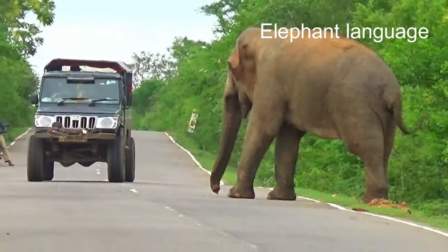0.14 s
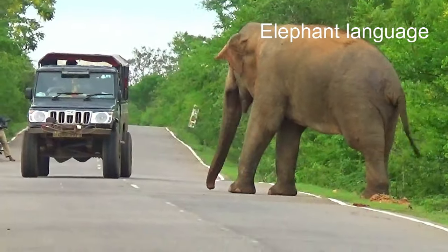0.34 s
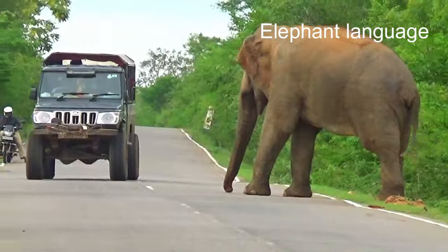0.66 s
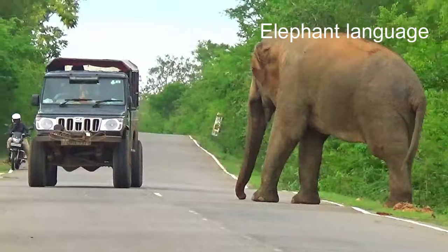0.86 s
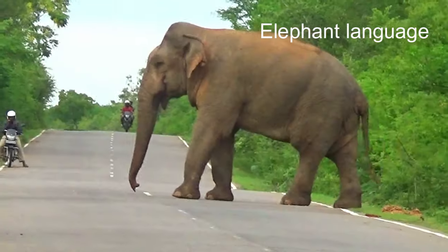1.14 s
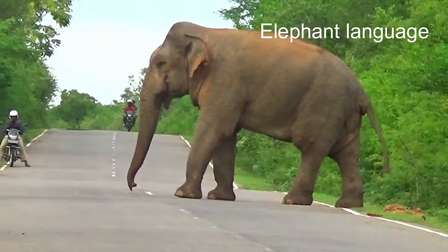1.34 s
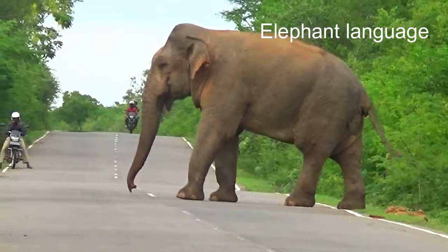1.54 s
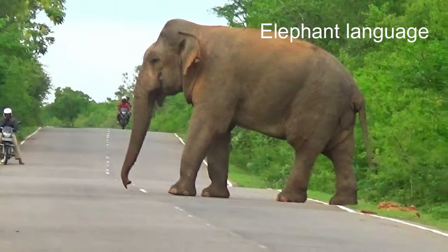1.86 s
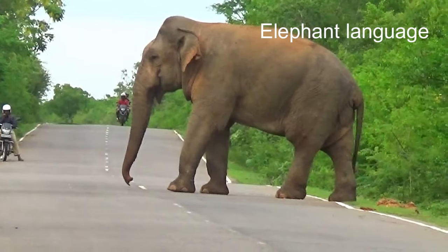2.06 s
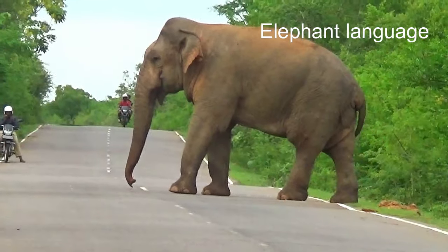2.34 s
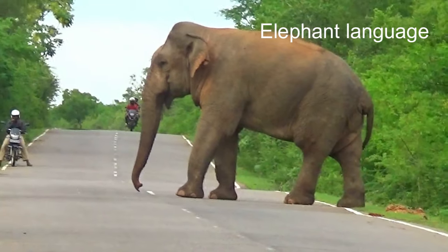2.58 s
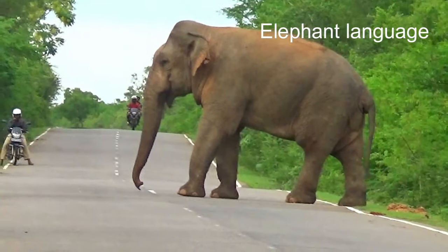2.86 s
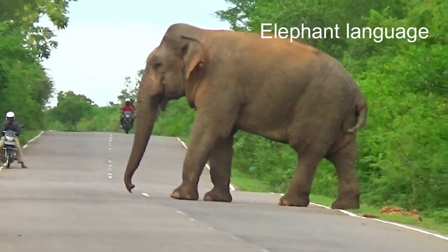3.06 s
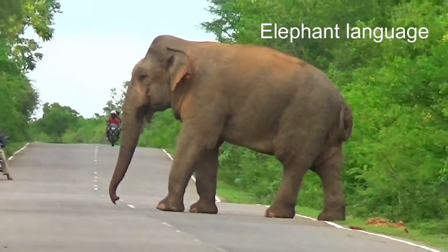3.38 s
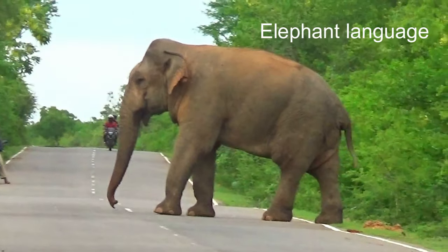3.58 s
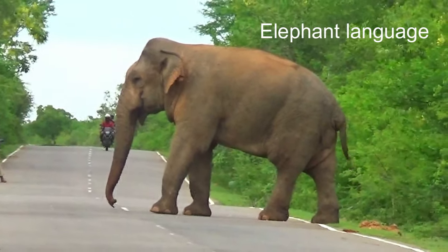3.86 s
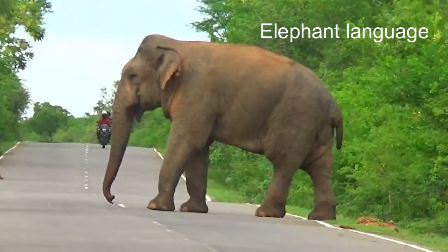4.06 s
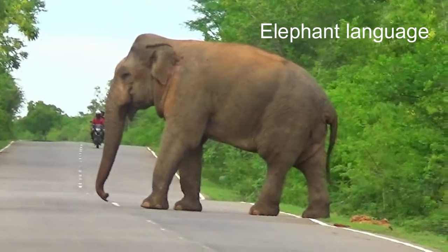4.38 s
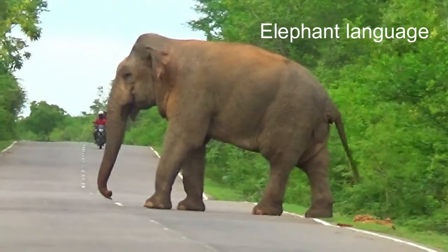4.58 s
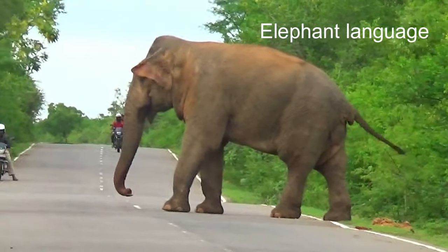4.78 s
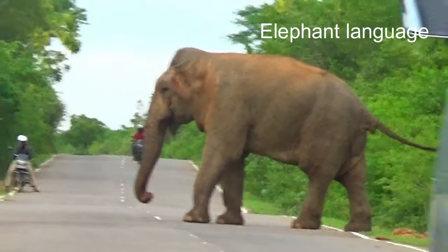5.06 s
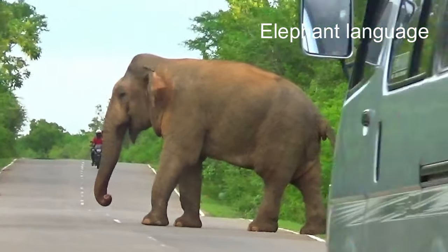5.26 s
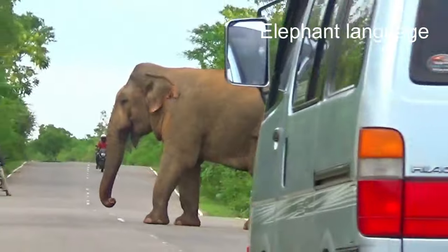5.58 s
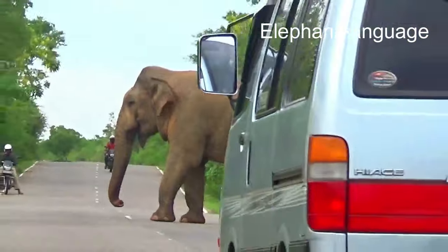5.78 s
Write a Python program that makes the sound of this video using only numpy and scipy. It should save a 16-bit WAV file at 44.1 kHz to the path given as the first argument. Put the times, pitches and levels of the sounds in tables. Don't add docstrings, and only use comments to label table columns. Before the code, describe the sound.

A bird whistles over a breezy rural road, then a clattering diesel van roars by, tyres humming, and fades with a squeaking panel.

```python
import sys
import numpy as np
from scipy import signal
from scipy.io import wavfile
from scipy.ndimage import uniform_filter1d

SR = 44100
rng = np.random.default_rng(int(sys.argv[2]) if len(sys.argv) > 2 else 0)


def log_audio(samples):
    frames = np.atleast_2d(samples).T
    limited = np.clip(frames, -1, 1)
    pcm = np.round(limited * 32767).astype(np.int16)
    wavfile.write(sys.argv[1], SR, pcm)


def gain_from_decibels(decibels):
    exponent = np.asarray(decibels, float) / 20
    return 10 ** exponent


N = 261513
HOP = 256
HZ = np.fft.rfftfreq(1024, 1 / SR)

# [side, bass L-R/dB, roar L-R/dB, clatter L-R/dB, fizz L-R/dB]
PAN_BY_SIDE = [(0, -1, -2.3, -1.6, 0), (1, -2.3, -2.7, -1.5, 2), (1.6, -4.5, -2.5, -3.5, 1.5),
               (2.2, -6, -1, -3, 0), (3, -6, .7, -1.3, -2), (3.3, -3.5, 2.8, -.3, -2), (4, -1, 2, 0, -1),
               (5, -.4, 2, 1, -.6)]


def evened(x):
    return x / np.sqrt(np.mean(x ** 2) + 1e-20)


def read(points, hz):
    f, value = np.transpose(points)
    return np.interp(np.log(hz + 1), np.log(f + 1), value)


def columns(rows, t):
    s, *cols = np.transpose(rows)
    return [np.interp(t, s, c) for c in cols]


def add(mix, s, sound):
    part = mix[round(s * SR):][:len(sound)]
    part += sound[:len(part)]


def resonate(x, hz, width_hz):
    r = np.exp(-np.pi * width_hz / SR)
    gain = (1 - r * r) / 2
    return signal.lfilter([gain, 0, -gain], [1, -2 * r * np.cos(2 * np.pi * hz / SR), r * r], x)


def ring(drive, modes):
    out = 0
    for hz, width_hz, db in modes:
        once = resonate(drive, hz, 1.4 * width_hz)
        out = out + gain_from_decibels(db) * np.sqrt(100 / width_hz) * resonate(once, hz, 1.4 * width_hz)
    return evened(out)


def bells(modes):
    return sum(db * np.exp(-((HZ - hz) / width_hz) ** 2 * 2) for hz, width_hz, db in modes)


def drift(seconds):
    steps = rng.standard_normal(N // 64 + 2)
    size = max(int(seconds * SR / 64), 1)
    smooth = evened(uniform_filter1d(uniform_filter1d(steps, size), size))
    return np.interp(np.arange(N) / 64, np.arange(len(steps)), smooth)


def noise(level_db, modes_db, same, pan_db, patchy_db):
    a, b, c, d, patches = rng.standard_normal(level_db.shape + (5,)).transpose(2, 0, 1)
    patches = evened(uniform_filter1d(uniform_filter1d(patches, size=12, axis=0), size=8, axis=1))
    same = np.clip(same, 0, 1)
    direct = (a + 1j * b) * gain_from_decibels(modes_db)
    scattered = (c + 1j * d) * np.sqrt((1 - same) / (1 + same))
    z = np.array([(direct + scattered) * gain_from_decibels(pan_db / 2), (direct - scattered) * gain_from_decibels(-pan_db / 2)])
    z *= gain_from_decibels(level_db + patchy_db * patches)
    return 0.7 * signal.istft(z.transpose(0, 2, 1), nperseg=1024, noverlap=1024 - HOP)[1][:, :N]


def air():
    # [f/Hz, density/(dB per Hz)]
    colour = [(18, -59), (30, -18), (81, -18), (103, -8.5), (187, -5.5), (284, -8), (322, -4), (433, -13.5),
              (659, -7), (844, -23), (955, -18.5), (1820, -21.5), (5810, -32), (7620, -18.5),
              (11000, -40.5), (14400, -74), (22000, -120)]
    # [f/Hz, likeness 0-1]
    likeness = [(60, 1), (220, 0.47), (800, 0.8), (2910, 0.43), (10600, 0.66)]
    field = np.tile(read(colour, HZ), (N // HOP + 5, 1))
    wash = evened(noise(field, 0, read(likeness, HZ), -0.14, patchy_db=1.5))
    low = signal.sosfiltfilt(signal.butter(2, 500, fs=SR, output="sos"), wash)
    return gain_from_decibels(-51.5) * (wash - low + low * gain_from_decibels(3.8 * drift(0.029)))


def ground():
    low = signal.sosfilt(signal.butter(4, 70, fs=SR, output="sos"), rng.standard_normal((2, N)))
    return gain_from_decibels(-82) * evened(low + 0.6 * low[::-1])


def insects():
    # [f/Hz, width/Hz, level/dB]
    band = (7300, 920, -58)
    return gain_from_decibels(band[2]) * ring(rng.standard_normal((2, N)), [band])


def idler():
    # [f/Hz, width/Hz, level/dB]
    modes = [(2500, 200, 5), (3060, 160, 4), (3900, 500, -23)]
    start_s, firings_per_s, decay_s = .089, 25.03, 0.0046
    turns = (np.arange(N) / SR - start_s) * firings_per_s
    ticks = signal.oaconvolve(knocks(turns, spread_db=0.5), np.exp(-np.arange(600) / SR / decay_s))[:N]
    return gain_from_decibels(-69) * ring(ticks * rng.standard_normal(N), modes)


def puffs():
    # [t/s, peak/dB, f/Hz]
    pushes = [(0.091, -59, 223), (0.123, -48, 180), (0.196, -40, 207), (0.258, -33.5, 150),
              (0.397, -37, 237), (0.483, -53, 177), (0.564, -54, 91.5), (0.565, -44, 148), (0.62, -51, 202),
              (0.676, -33, 240), (0.734, -39, 180), (0.829, -29.5, 200), (0.879, -43, 231),
              (1.003, -40, 175)]
    out, cycles = np.zeros(N), 3.5
    for s, db, hz in pushes:
        u = np.arange(int(cycles * SR / hz)) * hz / SR
        add(out, s, gain_from_decibels(db - 8.5) * np.sin(2 * np.pi * u) * np.sin(np.pi * u / cycles) ** 2)
    return out


def bird():
    # [t/s, length/s, first f/Hz, last f/Hz, level/dB]
    notes = [
        (-.02, 0.092, 2860, 2950, -62),
        (0.06, 0.051, 2940, 2910, -64),
        (.11, .095, 2900, 2925, -73),
        (.205, 0.032, 2640, 2590, -70),
        (0.229, 0.062, 2590, 2480, -68),
        (0.276, 0.055, 2480, 2425, -58.5),
        (0.318, 0.1, 2430, 2420, -56.5),
        (0.411, 0.052, 2390, 2140, -62),
        (1.134, .126, 3900, 3780, -67),
    ]
    t, level = np.arange(N) / SR, np.zeros(N)
    edge_share = 0.3
    s, length, first_hz, last_hz, _ = np.transpose(notes)
    inner = length * edge_share / 4
    knots_s = np.ravel([s + inner, s + length - inner], "F")
    hz = np.interp(t, knots_s, np.ravel([first_hz, last_hz], "F"))
    for start, span, _, _, db in notes:
        u = (t - start) / span
        level += gain_from_decibels(db + 4.5) * np.clip(np.minimum(u, 1 - u) * 2 / edge_share, 0, 1)
    hz = uniform_filter1d(hz, size=500) + 9 * drift(.01)
    out = level * np.sin(2 * np.pi * np.cumsum(hz) / SR) * gain_from_decibels(0.9 * drift(.008))
    return out + gain_from_decibels(-18) * np.roll(out, int(0.042 * SR)) + gain_from_decibels(-17) * np.roll(out, int(.075 * SR))


def passing(t):
    # [t/s, roar/dB, side]
    track = [(1.14, -36, 0.2), (1.75, -31, 0.12), (2.22, -26.5, 0.54), (2.54, -22, 1.08),
             (2.78, -19.5, 1.43), (3.0, -17, 1.73), (3.12, -15.5, 1.75), (3.24, -16, 2.25),
             (3.36, -16.5, 2.5), (3.48, -18, 2.95), (3.8, -21, 2.99), (4.2, -23.5, 3.51), (4.55, -25, 4.3),
             (5.13, -29.5, 4.98), (5.4, -30.5, 4.94), (5.6, -31, 5.36), (5.93, -32.5, 5.2)]
    # [side, rumble/dB, hiss/dB, fizz/dB]
    balance = [(0, -14, -9, -22), (.22, -12.5, -9.5, -21.5), (.48, -10.5, -10, -21.5),
               (.85, -11.5, -11, -21.5), (1.08, -11.5, -6, -20), (1.3, -10.5, -10, -20.5),
               (1.6, -8.5, -10, -17), (1.75, -11, -8.5, -13.5), (1.9, -14.5, -9.5, -13),
               (2.05, -11, -7, -12.5), (2.25, -13, -9, -10), (2.8, -7.5, -3.5, -10),
               (3.15, -8.5, -3.5, -10.5), (3.6, -12, -5, -13.5), (4.4, -12, -4.5, -15), (5, -10, -7, -12),
               (5.4, -10.5, -5.5, -8)]
    roar_db, facing = columns(track, t)
    rumble, hiss, fizz = columns(balance, facing)
    return facing, [roar_db + rumble, roar_db, roar_db + hiss, roar_db + fizz]


def shares(facing):
    return [np.clip(1 - abs(np.minimum(facing, 4) - k), 0, 1) for k in range(5)]


def doppler(t):
    pass_s, turn_s = 3.22, 0.25
    return 1 - np.tanh((t - pass_s) / turn_s)


def knocks(turns, spread_db):
    fired = np.diff(np.floor(turns), prepend=np.floor(turns[0]))
    return fired * gain_from_decibels(spread_db * rng.standard_normal(N))


def roar():
    # [f/Hz, density/(dB per Hz)]
    nose = [(30, -50), (80, -44), (140, -22), (250, -7), (450, -0.5), (800, 2.5), (1300, 7), (2500, -11),
            (2900, -22.5), (4200, -33), (6000, -37), (11000, -46.5)]
    wing = [(30, -46.5), (80, -40), (170, -13.5), (300, -6), (500, 2), (850, -1.5), (1300, -6.5),
            (2500, -18.5), (4000, -27.5), (6000, -31), (11000, -34)]
    flank = [(30, -45), (80, -30), (130, -20), (200, 6.5), (350, 0), (500, -12), (800, -7.5), (2000, -12.5),
             (4800, -24), (5500, -26), (11000, -26.5)]
    haunch = [(30, -47), (80, -40), (140, -28.5), (250, -15.5), (400, -14), (600, -3), (1000, -4),
              (3000, -11.5), (4800, -20.5), (5500, -25.5), (11000, -36.5)]
    tail = [(30, -29), (80, -39), (140, -13.5), (240, -10), (450, -9), (650, -1.5), (1200, -5.5),
            (2500, -12.5), (4800, -21.5), (5300, -24.5), (11000, -31.5)]
    # [f/Hz, width/Hz, level/dB]
    nose_modes = [(258, 28, 14), (352, 83, -21), (756, 160, 4), (1380, 83, -29), (1540, 130, 1),
                  (2180, 84, -15.5), (2590, 150, 7), (3210, 160, 4.5), (3780, 130, 1), (4500, 130, 6),
                  (1790, 70, -16), (2756, 157, -23), (3500, 100, -10), (4896, 240, -5), (5700, 100, -4)]
    wing_modes = [(456, 120, 2), (580, 100, -4.5), (888, 290, 5.5), (1620, 220, 7), (3830, 210, 4),
                  (1394, 130, -10.5), (2200, 510, 3.5), (4680, 100, 8)]
    flank_modes = [(653, 210, 4.5), (990, 180, 1.1), (2010, 400, 3.5), (7000, 990, 1.6), (11060, 1200, 9.3)]
    haunch_modes = [(380, 69, -3.5), (523, 74, 3.5), (600, 65, 3), (940, 36, -10), (1750, 210, 3),
                    (2350, 100, 0), (7300, 890, 2.5), (8840, 920, -5), (5270, 380, -3.5)]
    tail_modes = [(240, 27, 13.5), (401, 89, -15), (610, 170, 3), (914, 93, -16.5), (1193, 150, 4),
                  (1630, 51, 7), (2150, 147, 0), (2430, 90, 2.5), (2800, 84, -2.5), (5070, 120, -8),
                  (8960, 870, -3)]
    far_modes = [(5870, 1300, -4.5), (8300, 2500, -3), (192, 260, 5)]
    # [side, f/Hz, level/dB]
    ridge = [(.7, 800, 2.5), (1.1, 860, 0.5), (1.45, 930, 4.5), (1.75, 980, 0), (2.15, 1070, 4),
             (2.6, 1150, -1)]
    # [f/Hz, likeness 0-1]
    likeness = [
        [(60, 0.98), (140, 0.99), (340, 0.96), (800, 0.88), (1890, 1), (4470, 0.34), (10600, 0.94)],
        [(60, 0.93), (140, 1), (340, 1), (800, 0.6), (1890, 0), (4470, 0.3), (10600, 0.9)],
        [(60, 0.68), (140, 1), (340, 0.85), (800, 0), (1890, 0.66), (4470, 0.5), (10600, 0.46)],
        [(60, 0.87), (140, 0.8), (340, 0.88), (800, 0.62), (1890, 0.72), (4470, 0.79), (10600, 0.7)],
        [(60, 0.6), (140, 0.89), (340, 0.96), (800, 0.9), (1890, 0.86), (4470, 0.9), (10600, 0.89)],
    ]
    # [low f/Hz, high f/Hz]
    layers = [(60, 400), (400, 2500), (2500, 6000), (6000, 11000)]

    t = np.arange(N // HOP + 5) * HOP / SR
    facing, levels_db = passing(t)
    weights = shares(facing[:, None])
    field = sum(w * read(s, HZ) for w, s in zip(weights, [nose, wing, flank, haunch, tail]))
    side_modes = [nose_modes, wing_modes, flank_modes, haunch_modes, tail_modes]
    modes = sum(w * bells(s) for w, s in zip(weights, side_modes))
    modes = modes + np.clip(facing - 4, 0, 1)[:, None] * bells(far_modes)
    ridge_hz, ridge_db = columns(ridge, facing[:, None])
    ridge_width_hz = 140
    modes = modes + ridge_db * np.exp(-((HZ - ridge_hz) / ridge_width_hz) ** 2 * 2)
    same = sum(w * read(s, HZ) for w, s in zip(weights, likeness))

    power = gain_from_decibels(field + modes) ** 2
    centres = np.sqrt(np.prod(layers, axis=1))
    for db, (lo, hi), one in zip(levels_db, layers, np.eye(len(layers))):
        lift = db - 10 * np.log10(power[:, (HZ >= lo) & (HZ < hi)].sum(1))
        field = field + lift[:, None] * read(list(zip(centres, one)), HZ)

    bass, upper, clatter, fizz = (pan[:, None] for pan in columns(PAN_BY_SIDE, facing))
    low = read([(300, 1), (550, 0)], HZ)
    above = read([(1200, 0), (1900, 1)], HZ)
    high = read([(5500, 0), (7500, 1)], HZ)
    pan_db = bass * low + upper * (1 - low - above) + clatter * (above - high) + fizz * high
    return noise(field, modes, same, pan_db, patchy_db=1.03)


def hum():
    t = np.arange(N) / SR
    start_s, end_s, rise_db_per_s, fall_db_per_s = 3.07, 4.05, 108.5, 44
    hz = 620 + 55 * doppler(t) / 2
    db = -33.5 - rise_db_per_s * np.maximum(start_s - t, 0) - fall_db_per_s * np.maximum(t - end_s, 0)
    turn = 2 * np.pi * np.cumsum(hz) / SR
    steady = 1.74
    return gain_from_decibels(db) * ((steady + drift(.025)) * np.cos(turn) + drift(.025) * np.sin(turn))


def chinks(rows, length_s, trim_db):
    out, t = np.zeros(N), np.arange(int(length_s * SR)) / SR
    for (s, db, hz), wobble in zip(rows, rng.standard_normal((len(rows), 2000))):
        pitch = hz + 550 * uniform_filter1d(wobble, size=90)[:len(t)]
        swell = np.sin(np.pi * (t / length_s) ** .6) ** 2
        add(out, s, gain_from_decibels(db + trim_db) * swell * np.sin(2 * np.pi * np.cumsum(pitch) / SR))
    return out


def struck_parts():
    # [t/s, peak/dB, f/Hz]
    grit = [(2.33, -55, 10600), (2.51, -58, 10300), (3.2, -40, 10900), (3.3, -36.5, 10950),
            (3.365, -40, 7700), (3.38, -42, 7050), (3.43, -36, 7400), (3.555, -44, 6850),
            (3.648, -41, 7800), (3.67, -42, 7120), (3.735, -43, 7850), (3.86, -44, 7800), (3.94, -43, 7900),
            (4.015, -43, 7800)]
    # [t/s, peak/dB, f/Hz]
    booms = [(1.2123, -30, 1560), (1.2482, -26, 1650), (1.4987, -35, 1490), (1.583, -34, 1570),
             (1.6393, -30, 1600), (1.9372, -21.5, 1570), (2.0599, -23.5, 1580), (2.1457, -23, 1500),
             (2.1966, -33, 1590), (2.2609, -29, 1600), (2.3093, -27, 1650), (2.3682, -22, 1576),
             (2.4655, -33, 1630)]
    # [t/s, peak/dB, f/Hz]
    squeaks = [(4.4997, -36, 4830), (4.573, -31, 4760), (4.6199, -30, 4680), (4.7042, -35, 4820),
               (4.7735, -25, 4750), (4.8424, -30, 4680), (4.9003, -34, 4760), (4.9801, -31, 4750),
               (5.033, -36, 4780), (5.2185, -38, 4570), (5.5109, -33, 4800), (5.5677, -35, 4700),
               (5.6456, -34, 4730), (5.7463, -41, 4740)]
    return chinks(grit, .022, trim_db=6.5) + chinks(booms, .015, trim_db=-4) + chinks(squeaks, .024, trim_db=-5.5)


def shaking():
    # [t/s, length/s, level/dB]
    spells = [(2.396, 3.6, -52.5), (2.97, 0.55, -43.5), (3.16, 0.065, -38), (3.265, 0.065, -40),
              (3.41, .07, -43), (3.52, 0.18, -43), (3.7, 0.36, -45), (3.992, 0.37, -56), (4.487, 0.58, -46),
              (5.452, .25, -53), (5.74, .1, -56)]
    out = np.zeros(N)
    for s, length, db in spells:
        add(out, s, gain_from_decibels(db) * signal.windows.tukey(int(length * SR), 0.36))
    return out


def panel_rattle(t, turns, puff):
    # [f/Hz, width/Hz, level/dB]
    modes = [(4680, 99, 7), (4780, 53, 9.5)]
    # [start t/s, end t/s]
    lurch_s = (3.6, 4.3)
    burst_s = 4.783
    cycle = 2 * np.pi * (turns - turns[int(burst_s * SR)]) / 4
    lurch = np.interp(t, lurch_s, [.15, 1])
    rattle = ring(np.exp(0.23 * lurch * np.cos(cycle)) * (1.5 + puff) * rng.standard_normal(N), modes)
    squeak_hz = 4735 + 60 * lurch * np.sin(cycle) + 40 * drift(.006) + 88 * doppler(t)
    squeak = np.sin(2 * np.pi * np.cumsum(squeak_hz) / SR)
    squeak *= (2.3 + lurch * np.cos(cycle)) ** 2 * (0.3 + 0.6 * puff)
    return shaking() * evened(rattle + (0.36 + 0.6 * lurch) * evened(squeak))


def injector_tick(t, puff):
    # [f/Hz, width/Hz, level/dB]
    modes = [(5400, 190, 0)]
    # [start t/s, end t/s, edge/s, level over roar/dB]
    spell = (1.42, 2.44, .2, -30)
    start, end, edge, db = spell
    gate = np.clip(np.minimum(t - start, end - t) / edge + .5, 0, 1)
    return gate * gain_from_decibels(db) * ring((0.8 + puff) * rng.standard_normal(N), modes)


def clatter_knocks():
    # [t/s, peak/dB]
    events = [(1.1418, -39), (1.1713, -34), (1.2017, -41), (1.2396, -40), (1.2646, -40), (1.2885, -39),
              (1.3145, -38), (1.3539, -40), (1.3808, -35), (1.4147, -31), (1.4417, -38), (1.4781, -33),
              (1.5155, -36), (1.5474, -30), (1.5734, -29), (1.6113, -27), (1.6432, -30), (1.6761, -38),
              (1.7076, -36), (1.7415, -32), (1.7704, -32), (1.7999, -35), (1.8348, -29), (1.8707, -36),
              (1.9001, -36), (1.937, -36), (1.9795, -38), (2.0124, -34), (2.0558, -30), (2.1077, -37)]
    # [f/Hz, width/Hz, level/dB]
    modes = [(2570, 230, 2), (1600, 180, -11)]
    drive, t = np.zeros(N), np.arange(1500) / SR
    rise_s, decay_s = .002, 0.0068
    for s, db in events:
        add(drive, s, gain_from_decibels(db - 2.5) * np.minimum(t / rise_s, 1) * np.exp(-t / decay_s))
    clean = np.sin(2 * np.pi * np.cumsum(2550 + 70 * drift(.012)) / SR)
    return drive * (0.6 * ring(rng.standard_normal(N), modes) + 0.86 * clean)


def block_knock(puff):
    # [f/Hz, width/Hz, level/dB]
    modes = [(830, 200, -4), (1230, 150, -5), (1600, 150, -1), (2560, 190, -7), (3260, 150, -16)]
    return ring(puff * rng.standard_normal(N), modes)


def exhaust_tones(t, turns, facing):
    # [order of firing rate, level over rumble/dB at nose, wing, flank, haunch, tail]
    orders = [(1, -43, -47, -31, -27, -22), (2, -45, -28, -18.5, -12.5, -9),
              (3, -23, -29, -14.5, -16.5, -18), (3.77, -28, -21.5, -0.5, -11.5, -12.5),
              (4, -29, -17, -23.5, -11, -9), (5, -28, -16.5, -5, -2, -15.5),
              (6, -16.5, -13, -9.5, -15, -15), (7, -15.5, -21, -12.5, -17.5, -30),
              (9, -17, -43, -9, -20, -11.5), (11, -17, -26, -16, -21, -52)]
    # [t/s, half length/s, level/dB]
    hidden = (3.22, .09, -4)
    sides = shares(facing)
    hidden_db = hidden[2] * np.exp(-((t - hidden[0]) / hidden[1]) ** 4)
    out = np.zeros(N)
    for k, *dbs in orders:
        db = sum(w * side_db for w, side_db in zip(sides, dbs)) + 4.0 + (k == 2) * hidden_db
        db = db + 2.1 * drift(0.36) + 1.72 * drift(0.035)
        out += gain_from_decibels(db) * np.sin(2 * np.pi * (k * turns + 0.052 * drift(0.032) + rng.random()))
    return out


def firing_turns(t):
    # [t/s, firings per s]
    speed = [(1.13, 30), (1.5, 30.2), (1.9, 31.2), (2.3, 36.5), (2.7, 44), (3.0, 49.7), (3.2, 53.5),
             (3.4, 56.1), (3.6, 56.8), (4.0, 57.3), (4.5, 58.3), (5.0, 59.1), (5.5, 59.7), (5.93, 59.9)]
    return np.cumsum(columns(speed, t)[0]) / SR


def firing_puffs(t, turns):
    # [t/s, share of a firing]
    lag = [(1.13, .29), (3.4, .3), (4.2, .45), (5.93, .7)]
    clicks = knocks(turns - columns(lag, t)[0], spread_db=3.0)
    puff = signal.oaconvolve(clicks, np.exp(-np.arange(2000) / SR / 0.0087))[:N]
    return puff / np.sqrt(uniform_filter1d(puff ** 2, size=9000) + 1e-9)


def van():
    # [side, roar pulsing 0-1, knock over roar/dB]
    engine = [(-.3, 0.2, -2), (.2, 0.01, -12.5), (.5, 0.1, -16), (1, 0.02, -22), (2, 0.16, -24),
              (3, 0.17, -29), (4, 0.05, -11.5), (5, 0.06, -31)]
    t = np.arange(N) / SR
    turns = firing_turns(t)
    puff = firing_puffs(t, turns)
    facing, (rumble_db, roar_db, _, _) = passing(t)
    depth, knock_db = columns(engine, facing)

    body = roar()
    low = signal.sosfiltfilt(signal.butter(2, 450, fs=SR, output="sos"), body)
    top = signal.sosfiltfilt(signal.butter(2, 5500, "high", fs=SR, output="sos"), body)
    gate = 1 + np.clip(depth, 0, 1) * (uniform_filter1d(puff, size=60) - .7)
    spit = 0.21 * (uniform_filter1d(puff, size=30) - .7) + 0.031 * drift(0.014)
    pulsed = gain_from_decibels(2.5) * low + (body - low) * gate + top * spit

    bass, upper, clatter, _ = (gain_from_decibels(np.array([p, -p]) / 2) for p in columns(PAN_BY_SIDE, facing))
    exhaust = gain_from_decibels(rumble_db) * exhaust_tones(t, turns, facing)
    middle = gain_from_decibels(roar_db + knock_db) * block_knock(puff) + hum()
    loose = panel_rattle(t, turns, puff) + struck_parts()
    ticks = gain_from_decibels(roar_db) * injector_tick(t, puff) + clatter_knocks()
    return pulsed + exhaust * bass + middle * upper + (loose + ticks) * clatter


def scene():
    change_s, fade_s = 1.134, .004
    second = np.clip((np.arange(N) / SR - change_s) / fade_s, 0, 1)
    quiet = air() + idler() + puffs() * gain_from_decibels(np.array([[.2], [-.2]]))
    loud = van() + insects() + ground()
    return quiet * (1 - second) + loud * second + bird() * gain_from_decibels(np.array([[-3.5], [3.5]]))


def low_pass(x):
    return signal.sosfilt(signal.butter(12, 11190, fs=SR, output="sos"), x)


def record(dry):
    edge_hz, click_s, click_db = 11010, 1.1345, -39
    lowpass = signal.firwin(2047, edge_hz, window=("kaiser", 9), fs=SR)
    limited = signal.oaconvolve(dry, lowpass[None], "same")
    click = gain_from_decibels(click_db) * (np.arange(N) == round(click_s * SR))
    return low_pass(limited + click)


dry = scene()
out = record(dry)
log_audio(out)
```